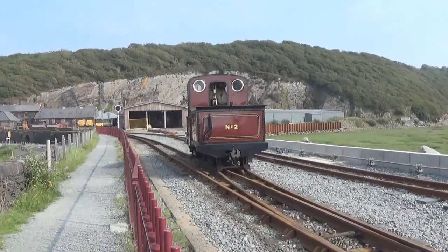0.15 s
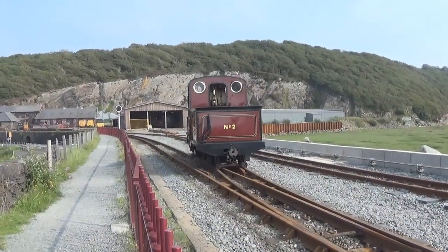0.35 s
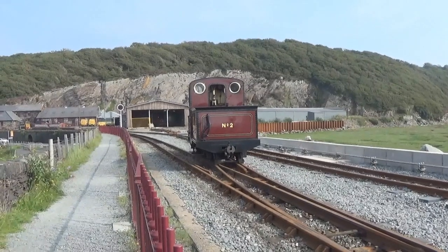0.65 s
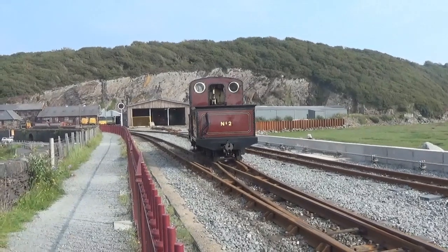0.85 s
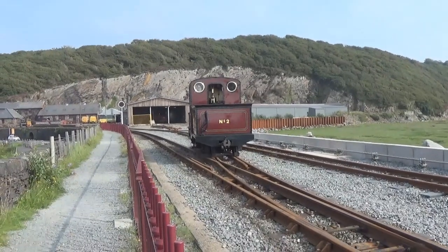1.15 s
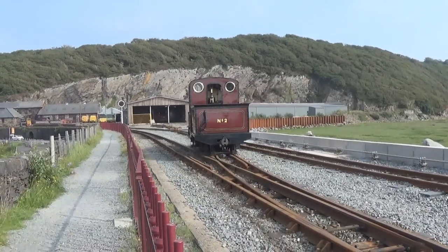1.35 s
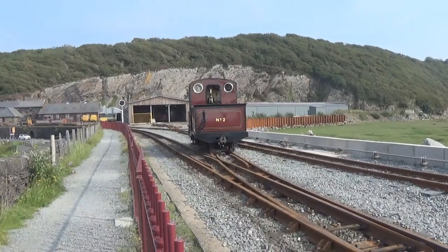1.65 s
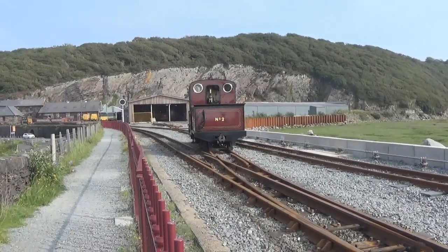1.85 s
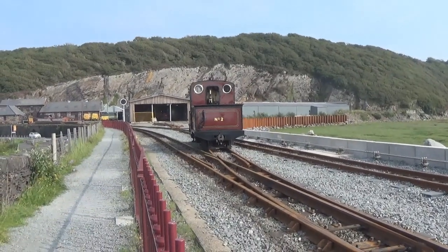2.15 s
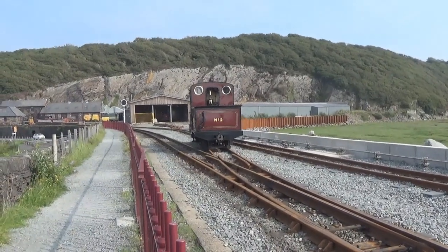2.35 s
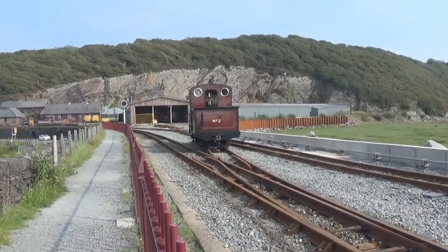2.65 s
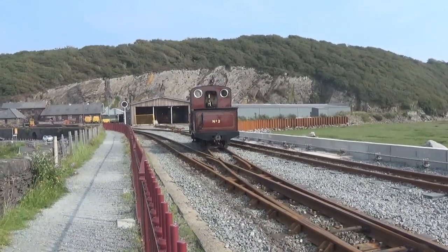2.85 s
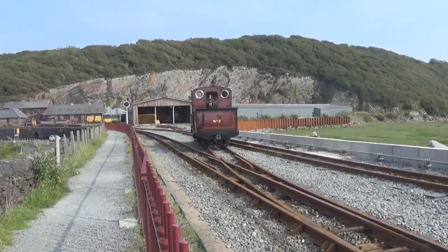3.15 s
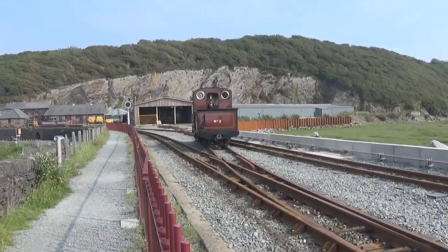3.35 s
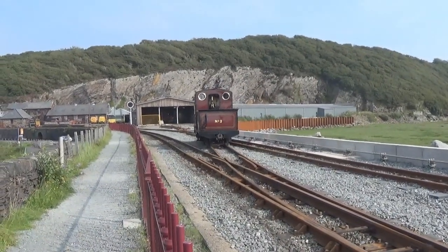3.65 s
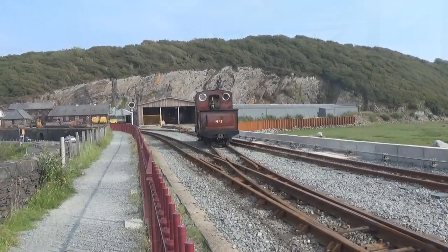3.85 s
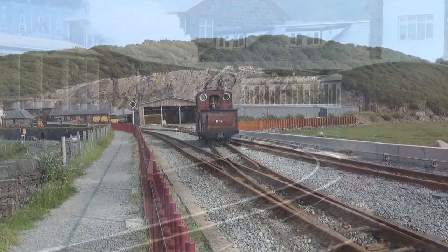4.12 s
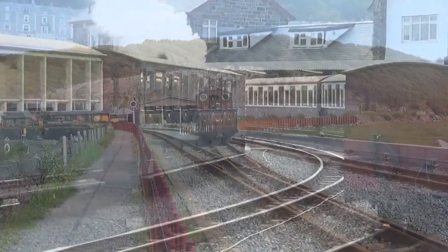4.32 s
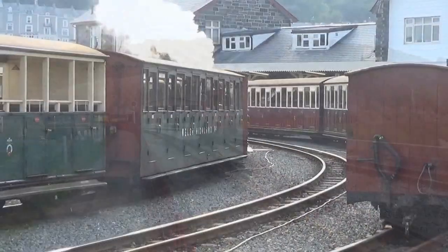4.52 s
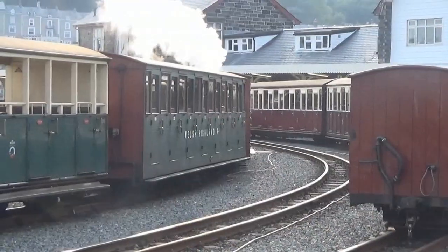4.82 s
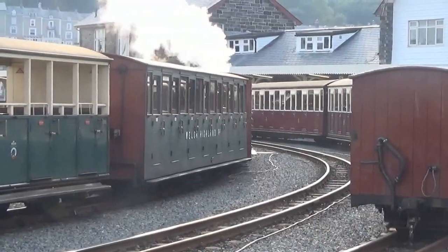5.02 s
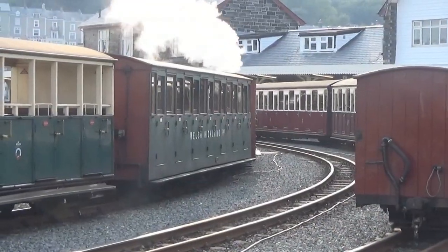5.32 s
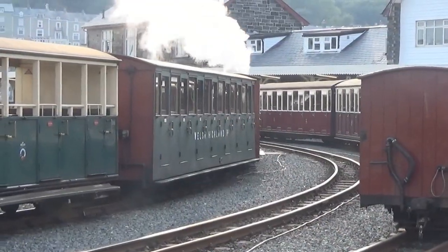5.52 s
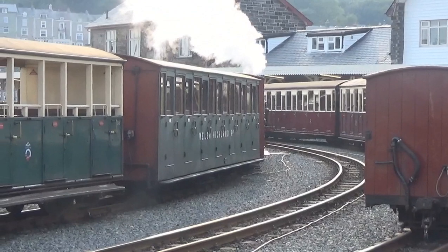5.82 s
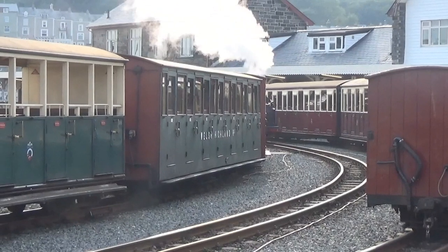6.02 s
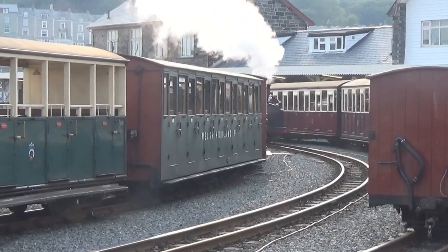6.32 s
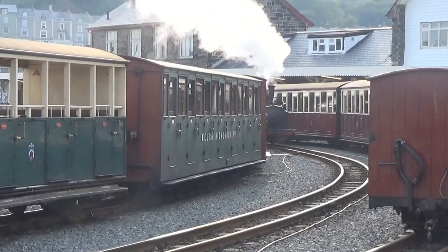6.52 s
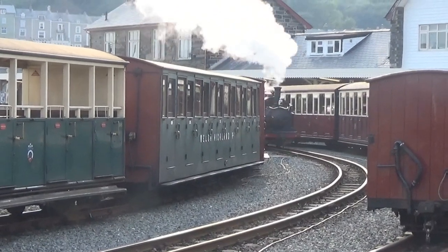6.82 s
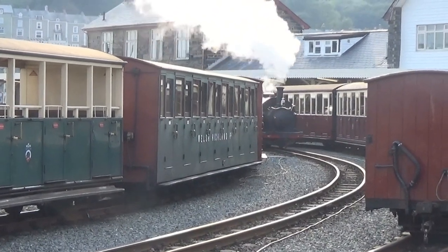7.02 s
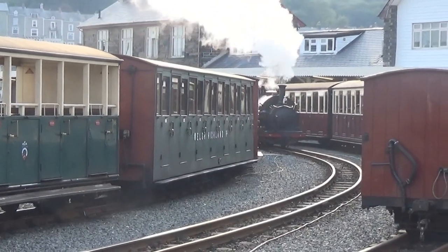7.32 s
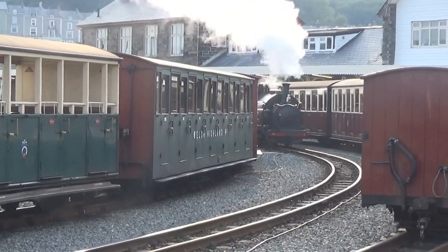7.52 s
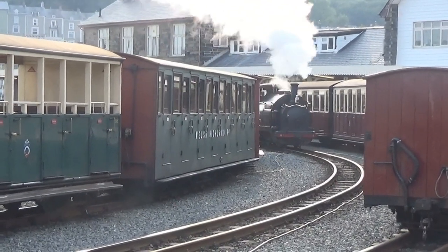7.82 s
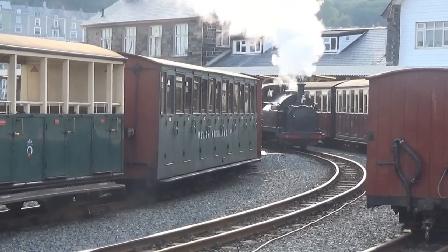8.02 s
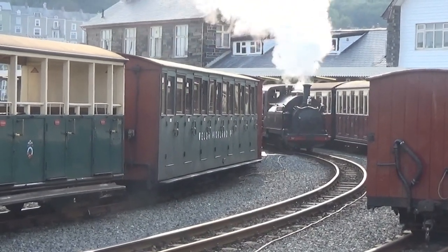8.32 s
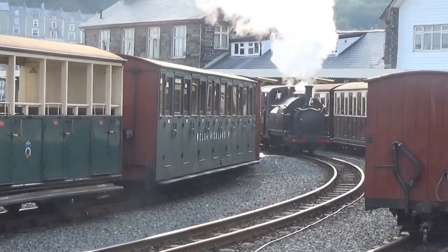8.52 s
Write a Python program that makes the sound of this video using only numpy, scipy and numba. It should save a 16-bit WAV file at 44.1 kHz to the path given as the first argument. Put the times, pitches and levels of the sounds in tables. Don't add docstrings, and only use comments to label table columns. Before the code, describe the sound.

Close, busy clatter opens as a small locomotive crosses points, rumbling and knocking with a brief wet steam hiss. The clatter grows sparser, with one hard cluster of clanks, then gritty stone crackles. The sound fades over to another engine venting steam among carriages: a rough, tonal hiss, muffled at first, opening up in treble. Open-air handheld stereo sound, with soft low wind bumps early in the yard.

```python
import sys
import numpy as np
from scipy import signal
from scipy.fft import rfft, irfft, next_fast_len
from scipy.io import wavfile
from scipy.ndimage import uniform_filter1d
from numba import njit

SR = 44100
rng = np.random.default_rng(int(sys.argv[2]) if len(sys.argv) > 2 else 0)


def to_wav(s):
    ch = np.atleast_2d(s).T
    pcm = np.round(np.clip(ch, -1, 1) * 32767)
    wavfile.write(sys.argv[1], SR, pcm.astype(np.int16))


def decibels_to_gain(level_db):
    exponent = np.asarray(level_db, float) / 20
    return 10 ** exponent


N = 382347
T = np.arange(N) / SR
HZ = np.fft.rfftfreq(next_fast_len(N), 1 / SR) + 1e-3

# frequency in Hz, side minus mid in dB.
ROLL_SIDE = [(60, -15), (110, -13), (190, -16.5), (340, -11), (610, -15), (1090, -12), (1950, -25),
             (3490, -10.5), (6230, -8), (11100, -9)]
# frequency in Hz, density in dB per Hz.
LEAK_COLOUR = [(120, -36), (200, -17), (404, -25), (463, -18), (804, -4), (1050, -14), (1830, -3),
               (2020, -11.5), (9780, -14.5), (11000, -17), (14300, -53), (22000, -120)]


def on_hz(points):
    f, db = np.transpose(points)
    return np.interp(np.log(HZ), np.log(f), db)


def on_time(table, silent_db=-120):
    s, *cols = np.transpose(table)
    level = np.interp(T, s, cols[0], silent_db, silent_db)
    return [level] + [np.interp(T, s, c) for c in cols[1:]]


def hump(middle, half):
    return np.cos(np.pi / 2 * np.clip((T - middle) / half, -1, 1)) ** 2


def unit(x):
    return x / np.sqrt(np.mean(x ** 2))


def walk(rate):
    k = int(SR / rate)
    held = np.repeat(rng.standard_normal(N // k + 1), k)
    return unit(uniform_filter1d(uniform_filter1d(held, k), k)[:N])


def bands(db, side, lo_hz, hi_hz, swell_db, flicker_db, flicker_rate):
    noise = rfft(rng.standard_normal((2, next_fast_len(N))))
    shape = decibels_to_gain(np.array([db, db + on_hz(side)])) * noise
    out, swell = 0, swell_db * walk(6)
    place = 2 * np.log2(HZ)
    for centre in np.arange(np.ceil(2 * np.log2(lo_hz)), 2 * np.log2(hi_hz)):
        window = np.cos(np.pi / 2 * np.clip(place - centre, -1, 1)) ** 2
        level = decibels_to_gain(swell + flicker_db * walk(flicker_rate))
        out = out + level * irfft(shape * window)[:, :N]
    return out / np.sqrt(np.mean(out[0] ** 2))


def burst(s, rise, t60):
    t = np.arange(int((3 * rise + t60) * SR)) / SR
    shape = (1 - np.exp(-t / rise)) ** 2 * 1000 ** (-t / t60)
    return int(s * SR), shape / shape.max()


def band(x, lo_hz, hi_hz):
    return unit(signal.sosfilt(signal.butter(3, [lo_hz, hi_hz], "band", fs=SR, output="sos"), x))


def ring(x, modes):
    out = 0
    for hz, db, t60 in modes:
        pole = np.exp(2j * np.pi * hz / SR - np.log(1000) / (t60 * SR))
        out = out + decibels_to_gain(db) * signal.lfilter([1], [1, -pole], x).imag
    return out


def rattle(blows, rise_ms, tick, tail_ms):
    out = np.zeros(N)
    for (s, db, mid_db), noise in zip(blows, rng.standard_normal((len(blows), SR // 3))):
        i, tail = burst(s, rise_ms / 1000, tail_ms / 1000)
        n = len(tail)
        shape = 0.39 * tail + tick * np.exp(-np.arange(n) / (0.0047 * SR))
        noise[-n] = 3.6
        colour = band(noise, 3440, 13400) + decibels_to_gain(mid_db + 6.0) * band(noise, 880, 3860)
        out[i:i + n] += decibels_to_gain(db - 9) * shape * colour[-n:]
    return out * decibels_to_gain(2.0 * walk(220))


def rolling():
    # time in seconds, level in dB.
    weight = [
        (0.0, -37),
        (0.6, -36),
        (0.85, -39.5),
        (1.5, -43.5),
        (2.0, -43),
        (3.3, -44.5),
        (3.85, -41.5),
        (4.45, -39.5),
        (4.7, -50),
    ]
    # frequency in Hz, density in dB per Hz.
    roll_colour = [(18, -56), (30, -30), (69, -12.5), (245, 0.5), (489, -7.5), (596, -7.5), (822, -4.5),
                   (885, -5), (1160, -12), (1350, -15), (1720, -15), (2320, -25), (3120, -24.5),
                   (5930, -37), (11000, -37), (14300, -67), (22000, -120)]
    # frequency in Hz, side minus mid in dB.
    rumble_side = [(40, -12), (110, -10), (250, -6.5), (500, -9)]
    # middle in seconds, half length in seconds, extra rumble in dB.
    rough_track = [
        (2.01, 0.21, 3.5),
        (2.36, 0.53, 6.5),
        (1.5, 0.22, 0),
        (3.55, 0.5, 1.5),
        (3.6, 0.11, -3.5),
        (.3, .3, 0.5),
        (1.18, 0.3, -3.5),
    ]
    roar_db = on_time(weight)[0]
    shake_db = sum(db * hump(s, half) for s, half, db in rough_track)
    bass_db = -45.87 + 0.72 * (roar_db + 44) + shake_db
    leak_db = -64.5 + (roar_db + 44)
    colour = on_hz(roll_colour)
    roar = bands(colour, ROLL_SIDE, 400, 15000, 0.44, 2.5, 27.98)
    bass = bands(colour, rumble_side, 20, 400, 0.46, 1.7, 14)
    leak = bands(on_hz(LEAK_COLOUR), ROLL_SIDE, 2500, 15000, 0.6, 1.9, 30.1)
    leak = leak * decibels_to_gain(2.5 * walk(45.4))
    fade = np.interp(T, [3.9, 4.7], [1, 0])
    return decibels_to_gain(roar_db) * roar + decibels_to_gain(bass_db) * bass * (T < 4.7) + decibels_to_gain(leak_db) * leak * fade


def drain_cock():
    # valve opens in seconds, level in dB, time held in seconds.
    spits = [
        (-.05, -41.5, 0.057),
        (.512, -38.5, 0.22),
        (.775, -50, 0.032),
    ]
    open_s, sag_db_per_s, shut_t60_s = 0.044, 12, 0.19
    valve = 0
    for s, db, held in spits:
        opening = np.clip((T - s) / open_s, 0, 1) ** 2
        sag_db = sag_db_per_s * np.clip(T - s - open_s, 0, held)
        shut_db = 60 * np.clip(T - s - held, 0, None) / shut_t60_s
        valve = valve + opening * decibels_to_gain(db - sag_db - shut_db)
    spurts = decibels_to_gain(1.4 * walk(63.0))
    steam = bands(on_hz(LEAK_COLOUR), ROLL_SIDE, 200, 15000, .5, 1.5, 31.1)
    return decibels_to_gain(3.5) * valve * spurts * steam


def rods():
    # start in seconds, peak in dB, 1.5-4 kHz minus peak in dB.
    rod_blows = [(0.009, -25.5, -10), (0.0283, -35, 3), (0.0714, -32, -12), (0.162, -38.5, 5),
                 (0.328, -36, -2), (0.4004, -46, -3), (0.5652, -24, -1), (0.5777, -27, 0), (0.619, -26, -2),
                 (0.723, -32, -3), (0.753, -30.5, -2), (0.7815, -31, -7), (0.829, -32, -6),
                 (0.946, -36, -5), (1.0303, -40, -3), (1.2115, -38, 0), (1.247, -38.5, -1),
                 (1.265, -37, -1), (1.292, -40, 1.5), (1.487, -46, -3), (1.5217, -35, -3.5),
                 (1.6746, -47, 6.5), (1.773, -35, -1), (1.8018, -32, 0), (2, -49, 3), (2.1254, -40, -8),
                 (2.1826, -42, -6), (2.2343, -37, -9), (2.352, -32, -3), (2.366, -27, 0.5)]
    return rattle(rod_blows, rise_ms=5, tick=.6, tail_ms=110)


def knocks():
    # start in seconds, peak in dB, thud in Hz, clank minus peak in dB, rise in ms.
    joints = [(0.058, -27, 730, -16, 6.2), (.144, -21.5, 613, -21.5, 1.15), (0.165, -22.5, 237, -21, 7.6),
              (0.252, -35, 700, -15, 1.7), (.35, -25, 410, -19, 5.9), (.454, -27.5, 588, -23, 1.6),
              (.5, -23.5, 780, -10, 24.3), (.6, -24.5, 772, -9, 11.6), (.66, -35, 715, -5, 8.5),
              (.715, -24.5, 645, -17, 9), (1.361, -31, 300, -17, 3.5), (1.671, -32, 766, -18, 12.5),
              (1.762, -31.5, 920, -13, 4.1), (1.779, -24, 297, -21.5, 5.5), (1.789, -22, 794, -5, 6.7),
              (1.816, -29, 885, -13, 4.1), (1.893, -35, 262, -16, 3.6), (2.263, -34, 354, -36, 18),
              (2.288, -26, 320, -31.5, 12), (2.34, -24, 1066, -11, 8.4), (2.364, -18.5, 767, -13, 7.2),
              (2.437, -34.5, 261, -36, 5.6), (2.529, -39, 314, -35, 13), (2.839, -41, 246, -29, 8)]
    # frequency in Hz, level in dB, decay time t60 in seconds.
    rail_modes = [(700, 5, 0.055), (948, 3, 0.07), (1500, 6, 0.067), (2180, -23, 0.016), (2600, -14, .03),
                  (3150, 2, 0.033)]
    thud, scrape = np.zeros(N), np.zeros(N)
    noise = rng.standard_normal((len(joints), 2, SR // 2))
    for (s, db, hz, clank_db, rise_ms), (a, b) in zip(joints, noise):
        decay_ms = 60 + 4.6 * rise_ms
        i, shape = burst(s, rise_ms / 1000, decay_ms / 1000)
        n = len(shape)
        pure = np.clip(-(clank_db + 14.5) / 20, .15, .6)
        note = 3.8 * pure * np.sin(2 * np.pi * hz * np.arange(n) / SR)
        body = (1.15 - pure) * (0.35 * band(a, hz / 1.47, hz * 1.21) + 0.74 * band(a, 157, 1520))
        thud[i:i + n] += decibels_to_gain(db - 7.5) * shape * (note + body[-n:])
        scrape[i:i + n] += decibels_to_gain(db + clank_db - 12.5) * shape ** 0.85 * b[:n]
    clank = signal.sosfilt(signal.butter(2, [1000, 5000], "band", fs=SR, output="sos"), scrape)
    return thud + decibels_to_gain(7.0) * clank + decibels_to_gain(-25.5) * ring(scrape, rail_modes)


def snaps():
    # start in seconds, peak in dB, pitch in Hz.
    stones = [(.146, -33, 700), (.150, -26, 600), (.257, -31, 800), (.456, -27, 650), (1.768, -32, 1100),
              (2.345, -31, 1300), (.535, -37, 900), (.575, -26, 5000), (.623, -29, 1500), (.752, -35, 5000),
              (1.214, -32, 9010), (1.250, -33, 1300), (1.488, -32, 9000), (1.522, -38, 9500),
              (2.815, -36, 7000), (2.918, -32, 7000), (1.801, -33, 1200), (2.374, -16.5, 890),
              (3.261, -37, 7500), (3.270, -36, 9000), (3.424, -34, 6000), (3.433, -30, 9000),
              (3.454, -32, 2950), (3.829, -34, 1600), (3.76, -37, 1500), (3.262, -38, 2400),
              (3.452, -38, 7000), (3.462, -21, 8500), (3.492, -26, 9500), (3.557, -38, 6000),
              (3.582, -34, 8000), (3.667, -25, 8500), (3.808, -31, 8650), (3.829, -38, 4870),
              (3.838, -26, 8400)]
    out = np.zeros(N)
    for s, db, hz in stones:
        turn = hz * np.arange(int(5 * SR / hz)) / SR
        i = int(s * SR)
        out[i:i + len(turn)] += decibels_to_gain(db) * 1.43 * np.sin(2 * np.pi * turn) * np.exp(-turn / 0.97)
    return signal.sosfilt(signal.butter(2, 300, "high", fs=SR, output="sos"), out)


def rail_rings():
    # start in seconds, frequency in Hz, level in dB, decay time t60 in seconds.
    struck = [(.160, 1560, -34, 0.06), (.162, 2770, -38, 0.078), (.162, 4250, -45, .07),
              (1.60, 1600, -43, .1), (1.797, 3670, -27, 0.04), (1.813, 3590, -35, 0.051),
              (1.836, 3680, -44, .12), (1.766, 1480, -38, .06), (1.797, 2790, -34, 0.046),
              (1.853, 3000, -51, .12), (2.19, 2310, -49, 0.046), (2.46, 3060, -59, .08),
              (2.812, 2350, -44, 0.041), (2.917, 2320, -50, .07), (3.456, 3080, -44, .05)]
    out = np.zeros(N)
    for s, hz, db, t60 in struck:
        i, shape = burst(s, 0.0016, t60)
        n = len(shape)
        out[i:i + n] += decibels_to_gain(db) * shape * np.sin(2 * np.pi * hz * np.arange(n) / SR)
    return out


def ballast():
    # start in seconds, peak in dB.
    crunches = [(2.569, -40), (2.6095, -44), (2.812, -37.5), (2.9165, -36), (2.9725, -40), (3.019, -40),
                (3.178, -33.5), (3.2615, -36), (3.326, -42), (3.4244, -33), (3.461, -38), (3.451, -32),
                (3.491, -38), (3.5585, -37), (3.583, -34), (3.838, -44), (3.665, -30.5), (3.76, -36),
                (3.798, -43), (3.828, -34)]
    return rattle([(s, db, -3) for s, db in crunches], rise_ms=3, tick=.3, tail_ms=240)


@njit
def resonate(x, hz, width):
    y, b, l = np.empty(len(x)), 0., 0.
    for i in range(len(x)):
        g, k = np.tan(np.pi * hz[i] / SR), width / hz[i]
        v = (b + g * (x[i] - l)) / (1 + g * (g + k))
        b, l, y[i] = 2 * v - b, l + 2 * g * v, k * v
    return y


def sharp_resonance(flow, centre, width):
    return resonate(resonate(flow, centre, 1. * width), centre, 1. * width)


def vent_pipe(flow, tuning, note_db, low_db, edge_db, treble_db):
    # frequency in Hz, width in Hz, level in dB, growth in dB per second.
    pipe_modes = [(368.3, 40, -20, 0), (583, 25, -15.5, -0.5), (923, 49, -12, -2), (1056, 61, -11, -0.5),
                  (1187, 25, -0.5, -0.1), (1281.3, 35, 4, 0.3), (1332, 38, -0.5, 0.4), (1479, 21, 1, 0.2),
                  (1672, 100, -3.5, 0), (1902, 128, -2.5, -1), (1968, 42, -5.5, -0.5), (2140, 79, -9, -1),
                  (2440, 94, -3, -0.5), (2537, 81, -8.5, -0.7), (2622, 78, -4.5, 0), (3003, 36, -8.5, 0),
                  (3215, 31, -5.5, -0.5), (3420, 90, -8.5, 1), (3846, 40, -7, 1), (4036, 100, -8.5, -1),
                  (4950, 140, -8, 1), (5200, 110, -10, 0.4), (5737, 160, -15, .5), (5830, 81, -10.5, 2),
                  (6335, 200, -13, .8), (8400, 1600, -15.5, 0), (9180, 270, -18, 4),
                  (10090, 160, -9.5, 0.5)]
    out = np.zeros(N)
    for hz, width, db, growth_db in pipe_modes:
        if 1150 < hz < 1450:
            share_db = note_db
        elif hz > 4500:
            share_db = treble_db
        elif hz > 2600:
            share_db = edge_db
        else:
            share_db = low_db if hz < 1000 else .4 * low_db
        if hz < 1450:
            centre, wander_db = hz * tuning, 0.73 * walk(12)
        else:
            centre, wander_db = hz * (1 + .009 * walk(1.3)), 1.34 * walk(7)
            
        wander_db = wander_db + (1.1 * walk(2.465))
        level = decibels_to_gain(db + 18.6 + share_db + growth_db * (T - 6.5) + wander_db)
        out += level * sharp_resonance(flow, centre, width)
    return out


def carriage_gaps(flow):
    # middle in seconds, half length in seconds, frequency in Hz, width in Hz, level in dB.
    cavities = [(6.63, 0.13, 670, 12, -0.5), (5.4, 0.6, 790, 16, -2), (6.65, 0.56, 1200, 20, -1),
                (7.95, 0.33, 860, 18, -5), (8.4, 0.33, 565, 13, -10.5), (5.1, 0.39, 560, 19, -13.5),
                (7.22, 0.34, 375, 20, -14.5), (5.75, .15, 850, 20, -1), (5.26, 0.7, 2125, 28, 0),
                (5.54, .3, 1890, 25, 2), (4.67, 0.68, 2430, 73, -5.5), (4.54, 0.73, 1940, 41, -7),
                (8.65, 0.42, 2450, 40, 0.5), (7.92, 0.74, 2400, 27, -9), (6.4, 0.61, 5690, 90, -19),
                (5.7, .6, 5850, 140, -8.5), (6.73, 0.32, 5200, 150, -7), (7.68, .6, 5500, 110, -8.5),
                (7.4, 0.97, 6360, 170, -8.5), (4.9, 0.18, 7800, 140, -7), (6.6, 0.53, 9200, 200, -12),
                (8.3, 0.32, 4200, 34, -5.5), (8.2, 0.55, 3390, 80, -9), (4.74, 0.54, 3380, 40, -6.5)]
    out = np.zeros(N)
    for s, half, hz, width, db in cavities:
        centre = hz * (1 + .0045 * walk(3.035))
        out += decibels_to_gain(db + 20.0 + 2.4 * walk(9)) * hump(s, half) * sharp_resonance(flow, centre, width)
    return out


def carriage_echoes(x, echo_db, reach, hold):
    hop, taps = int(hold * SR), int(reach * SR)
    out, fade = np.zeros((2, N + 3 * hop + taps)), signal.windows.hann(2 * hop)
    padded = np.pad(x, ((0, 0), (hop, 2 * hop)))
    fall = decibels_to_gain(echo_db) * 30 ** (-np.arange(taps) / taps) / np.sqrt(taps / 7)
    for i in range(0, N + hop, hop):
        common, left, right = rng.standard_normal((3, taps))
        paths = fall * (common + 0.085 * np.array([left, right]))
        paths[:, :taps // 5] = 0
        paths[:, 0] = 1
        out[:, i:i + 2 * hop + taps - 1] += signal.fftconvolve(padded[:, i:i + 2 * hop] * fade, paths, axes=1)
    return out[:, hop:hop + N]


def jet():
    # time in seconds, steam flow in dB, share of the vent in open view from 0 to 1,
    # pipe note in dB, pipe tuning as a ratio.
    blow_off = [(3.7, -36.5, 0.04, 3, 0.96), (4.4, -28.5, 0.11, 1.5, 1.004), (4.9, -30, 0.06, 3.5, 0.96),
                (5.3, -30.5, 0.2, 2.5, 0.98), (5.6, -30, 0.17, 1.5, 0.99), (5.9, -31, 0.5, 4.5, 1.01),
                (6.25, -30, 0.33, -1, 1.01), (6.7, -31.5, 0.41, 1.5, 1.025), (7.0, -29, 0.22, 1.5, 0.93),
                (7.2, -30.5, 0.69, 3, 0.99), (7.58, -29.5, 0.89, 3.5, 1.0), (7.85, -27, 0.47, -2, 0.99),
                (8.27, -25, 0.3, -1.5, 1.03), (8.55, -28, 0.4, -2.5, 1), (8.67, -27.5, 0.63, 2, 1)]
    # frequency in Hz, density in dB per Hz.
    jet_colour = [(18, -80), (30, -45.5), (329, -25), (364, -22), (658, -21), (842, -15), (1110, -7.5),
                  (1280, 1), (1560, -12.5), (2560, -18), (4300, -15.5), (5790, -5.5), (6710, -5.5),
                  (9720, -7), (11000, -10.5), (14300, -47), (22000, -120)]
    # frequency in Hz, side minus mid in dB.
    jet_side = [(60, -16), (110, -27), (190, -19), (340, -10), (610, -9.5), (1090, -7), (1950, -16),
                (3490, -9), (6230, -12), (11100, -13.5)]
    # frequency in Hz, width in Hz, level change in dB.
    echo_dips = [(1006, 25, -12.5), (1143, 69, -10.5), (1482, 21, -16), (1790, 33, -1), (2630, 62, 5),
                 (4170, 650, -4.5), (5530, 230, -2.5), (6780, 600, -6), (9430, 120, 3)]
    # middle in seconds, depth in dB.
    slugs = [
        (4.67, -12),
        (8.57, -22),
    ]
    # middle in seconds, half length in seconds, level change in dB.
    surges = [(4.014, .1, 1.5), (4.714, .06, 2), (4.45, .15, -2), (4.9, 0.053, 3.5), (4.982, 0.065, -6.5),
              (5.591, 0.065, 5.5), (6.08, .05, -1), (7.374, .09, 2.5), (7.5, 0.057, -7),
              (8.004, 0.053, 4.5), (5.15, .15, 5.5), (8.62, .05, -2)]
    flow_db, view, ring_db, tuning = on_time(blow_off)
    fade_in = np.sin(np.pi / 2 * np.interp(T, [3.484, 4.92], [1e-3, 1]))
    jet_db = flow_db + 40 * np.log10(fade_in)
    note_db = ring_db - .3 + .8 * walk(12)
    note_db = note_db + sum(db * hump(s, .045) for s, db in slugs)
    note_db = note_db + sum(db * hump(s, half) for s, half, db in surges)
    treble_db = -4 + 9.5 * view
    low_db = -0.8 * (flow_db + 30.5)
    edge_db = 0.068 * (treble_db + 6.0)
    colour = on_hz(jet_colour) + sum(db / (1 + (2 * (HZ - f) / w) ** 2) for f, w, db in echo_dips)
    roar = bands(colour, jet_side, 20, 1100, 0.25, 2.15, 7.2)
    note = bands(colour, jet_side, 1100, 1500, 0.19, 0.73, 29)
    body = bands(colour, jet_side, 1500, 2600, .3, .7, 9)
    edge = bands(colour, jet_side, 2600, 4500, .3, .7, 9)
    treble = bands(colour, jet_side, 4500, 15000, .3, 1.0, 10)
    steam = decibels_to_gain(low_db - 8.5) * roar + decibels_to_gain(note_db - 5.5) * note + decibels_to_gain(0.66 * low_db - 7.5) * body
    mid, side = steam + decibels_to_gain(edge_db - 4.0) * edge + decibels_to_gain(treble_db - 2.0) * treble
    flow = rng.standard_normal(N)
    mid = mid + vent_pipe(flow, tuning, note_db, low_db, edge_db, treble_db) + carriage_gaps(flow)
    pan_db = np.array([[-0.1], [0.1]])
    ears = np.array([mid + side, mid - side]) * decibels_to_gain(jet_db - 0.09 + pan_db)
    return carriage_echoes(ears, echo_db=-6.5, reach=0.05, hold=0.606)


def wind():
    # start in seconds, peak in dB.
    bumps = [(4.499, -53), (4.717, -30), (4.789, -32), (4.859, -48), (4.93, -35), (5.089, -41),
             (5.179, -52), (5.249, -38), (5.423, -31), (5.459, -36), (5.529, -39), (5.859, -63),
             (6.099, -53)]
    since = T - 4.4
    gust_db = -54.5 - 60 * np.clip(T - 4.8, 0, None) / 0.48
    breeze_db = -58 - 4 * since
    gusts = (since > 0) * (decibels_to_gain(gust_db) + decibels_to_gain(breeze_db)) * decibels_to_gain(2.5 * walk(14))
    for s, db in bumps:
        i, shape = burst(s, 0.0044, 0.073)
        gusts[i:i + len(shape)] += decibels_to_gain(db - 9.5) * shape
    mid, side = (band(rng.standard_normal(N), 72, 296) for _ in range(2))
    return gusts * (mid + 0.48 * side * np.array([[1], [-1]]))


def scene():
    mid, side = rolling() + drain_cock()
    blows = rods() + knocks() + snaps() + rail_rings() + ballast()
    n = SR // 4
    scatter = rng.standard_normal((2, n)) * 1000 ** (-np.arange(n) / (.25 * SR))
    echoes = decibels_to_gain(-39.5) * signal.fftconvolve(blows[None], scatter, axes=1)[:, :N]
    return np.array([mid + side, mid - side]) + blows + echoes + jet() + wind()


def band_limit(x):
    return signal.sosfilt(signal.butter(12, 11730, fs=SR, output="sos"), x)


def record(dry):
    # frequency in Hz, lead of the left in radians.
    port_phase = [(0, 0.07), (2070, -0.77), (4390, -0.011), (5940, -0.33), (11300, -0.061)]
    # frequency in Hz, left minus right in dB.
    port_balance = [(0, 0.3), (1200, 0.6), (2000, -0.2), (4000, -2), (11300, -0.5)]
    top_hz = SR / 4
    edge = decibels_to_gain(np.interp(HZ, [top_hz - 40, top_hz + 60, top_hz + 700], [0, -50, -75]))
    lead = np.interp(HZ, *np.transpose(port_phase))
    balance_db = np.interp(HZ, *np.transpose(port_balance))
    lean = .5j * lead + np.log(decibels_to_gain(balance_db / 2))
    ports = np.exp(lean * np.array([[1], [-1]]))
    mix = irfft(rfft(dry, next_fast_len(N)) * edge * ports)[:, :N]
    return band_limit(mix)


dry = scene()
out = record(dry)
to_wav(out)
```